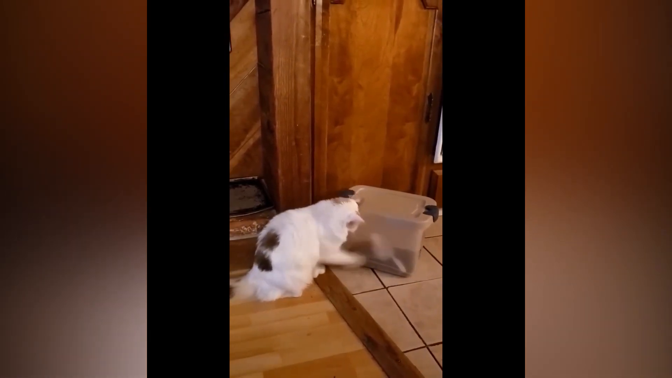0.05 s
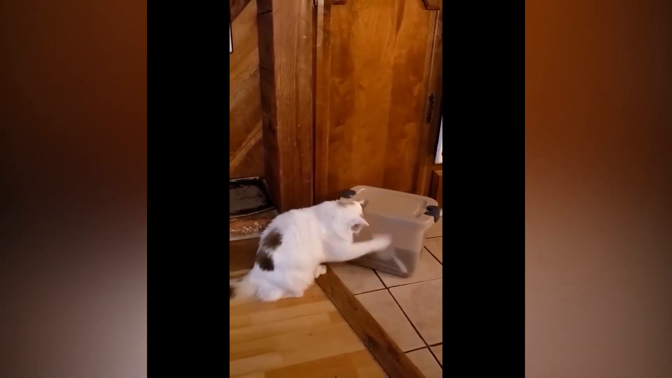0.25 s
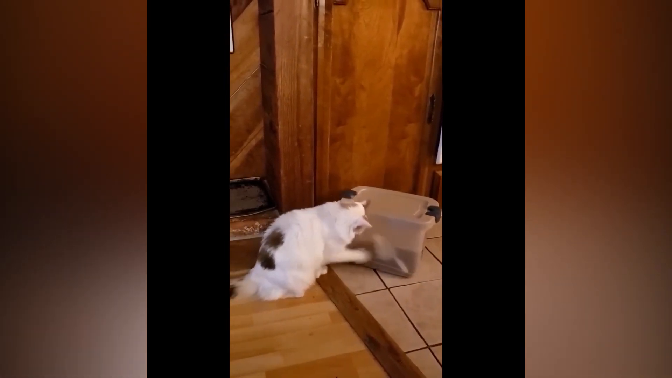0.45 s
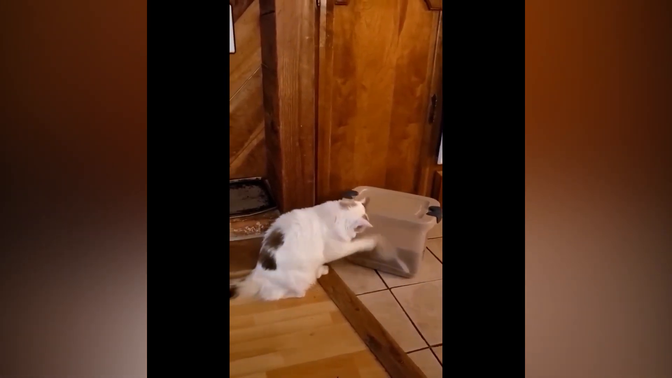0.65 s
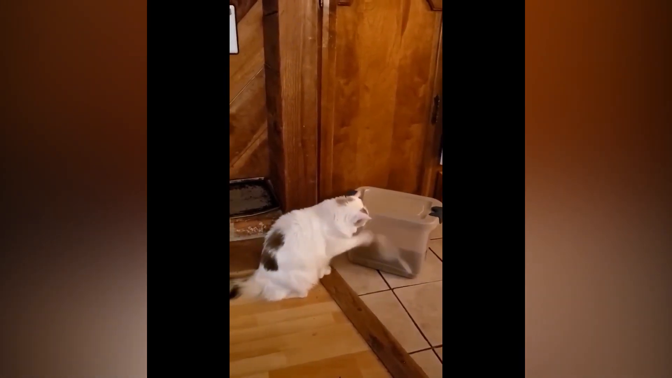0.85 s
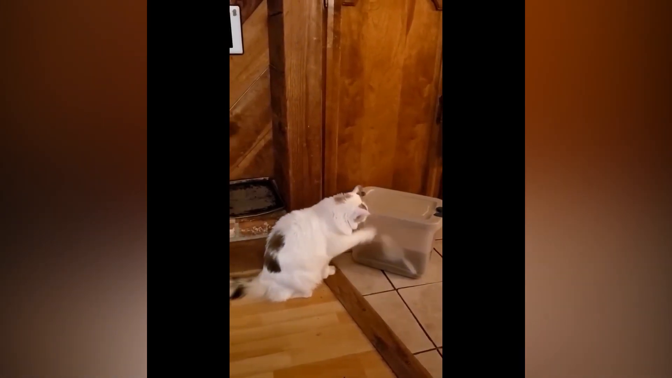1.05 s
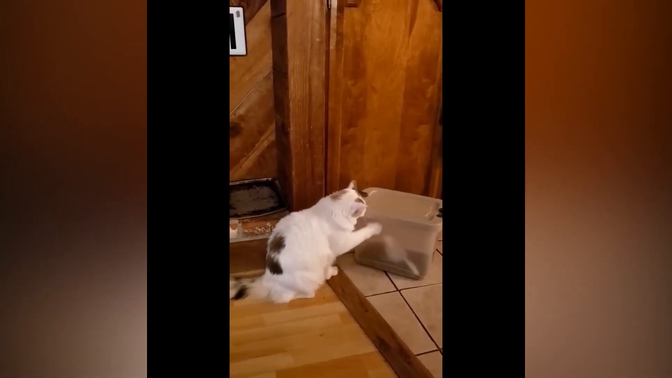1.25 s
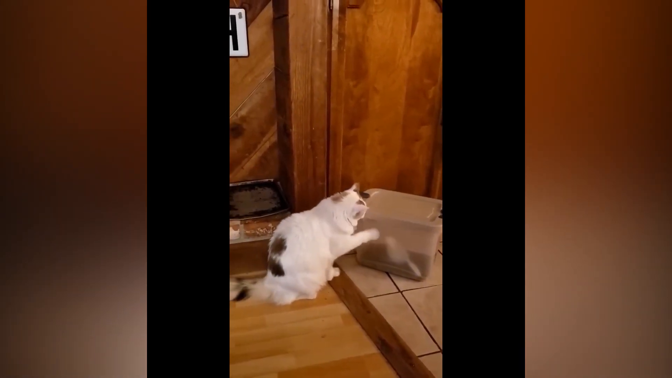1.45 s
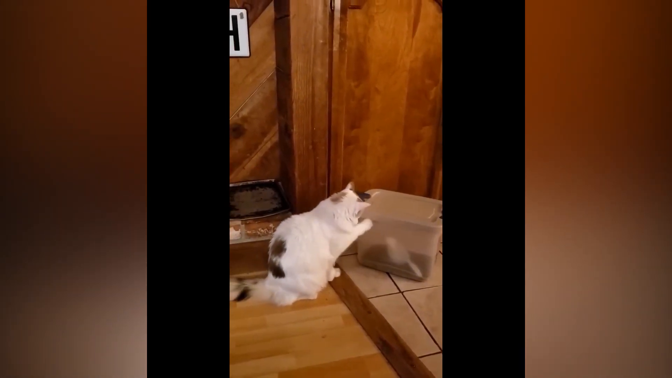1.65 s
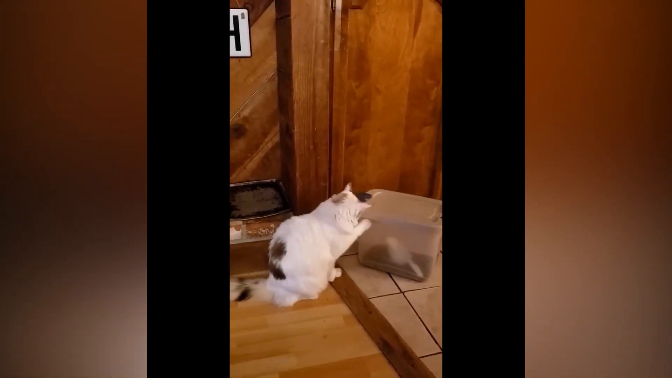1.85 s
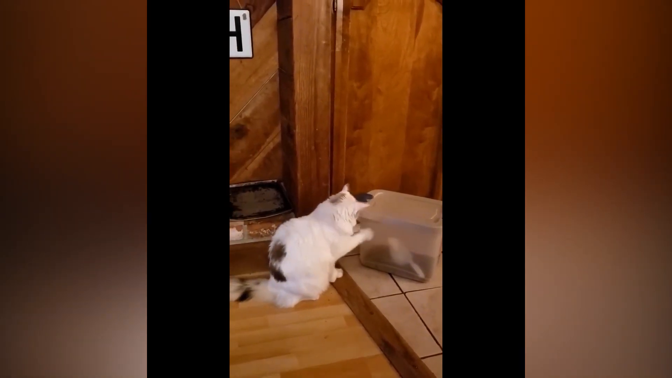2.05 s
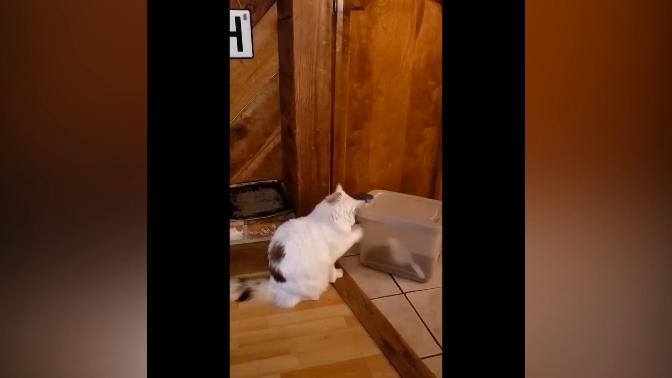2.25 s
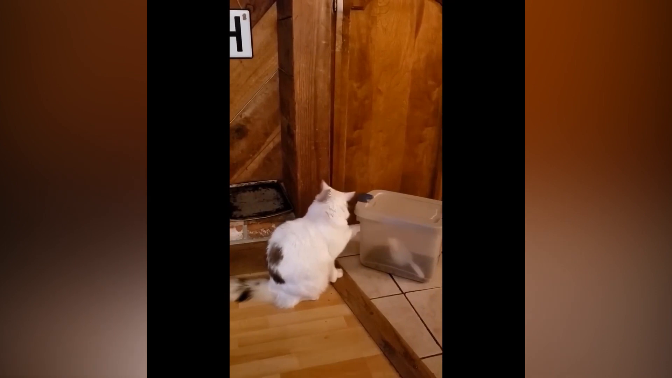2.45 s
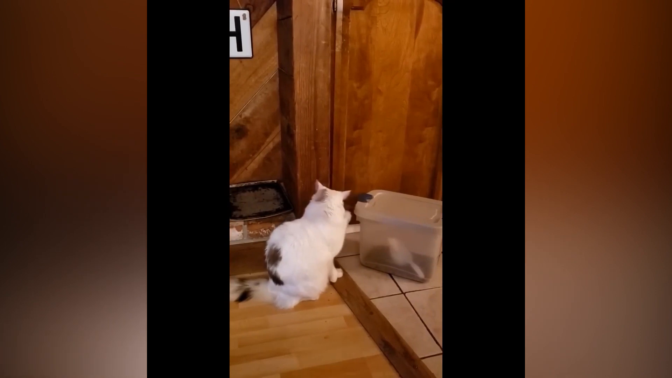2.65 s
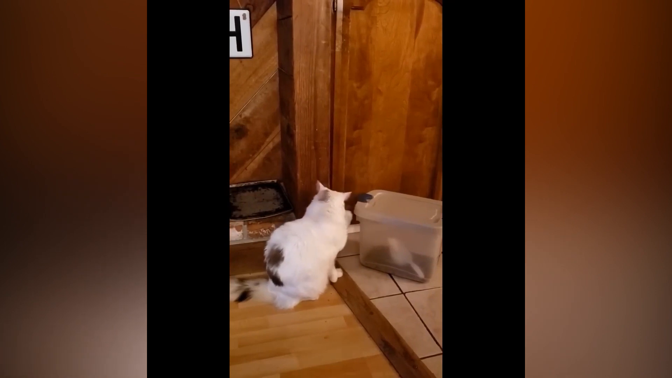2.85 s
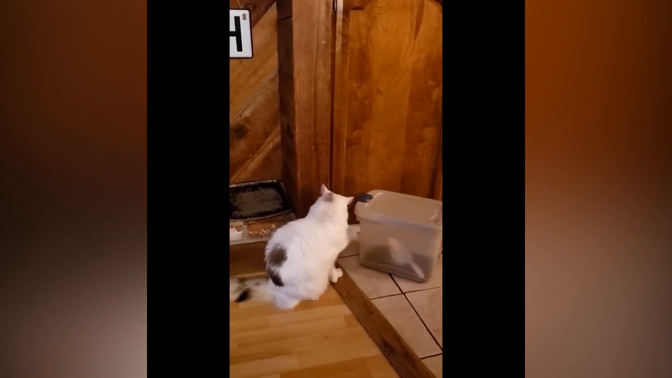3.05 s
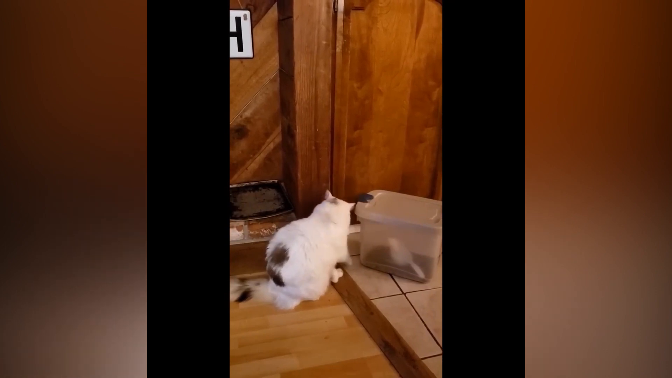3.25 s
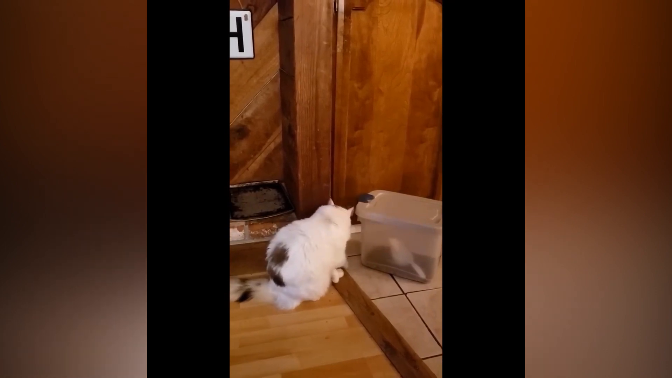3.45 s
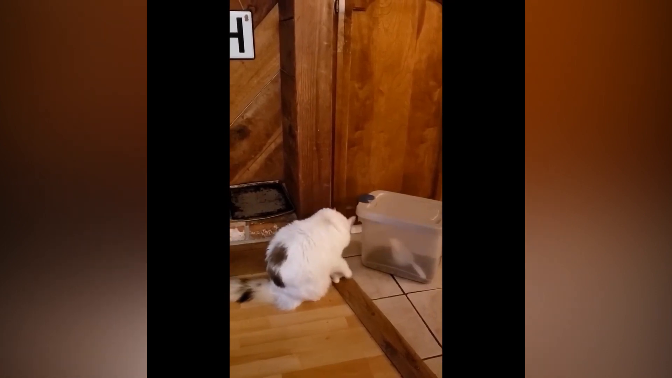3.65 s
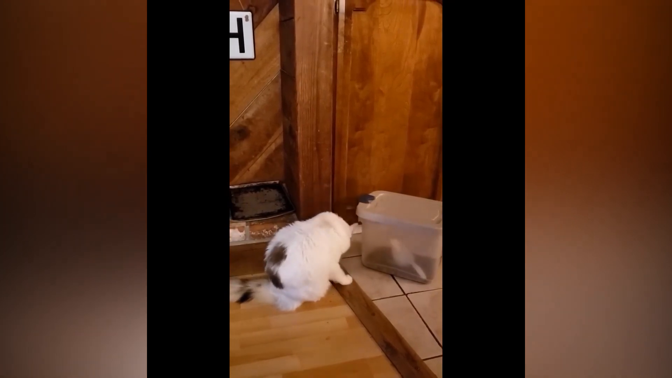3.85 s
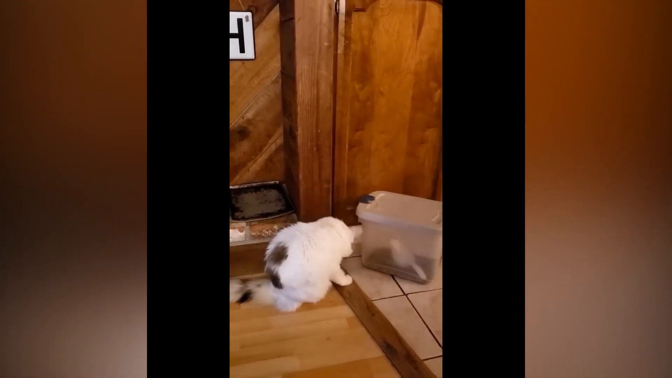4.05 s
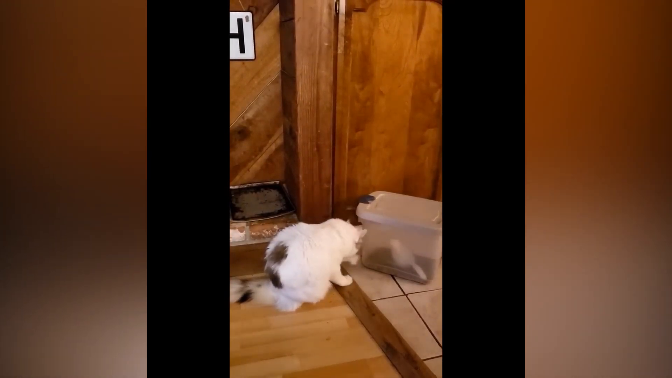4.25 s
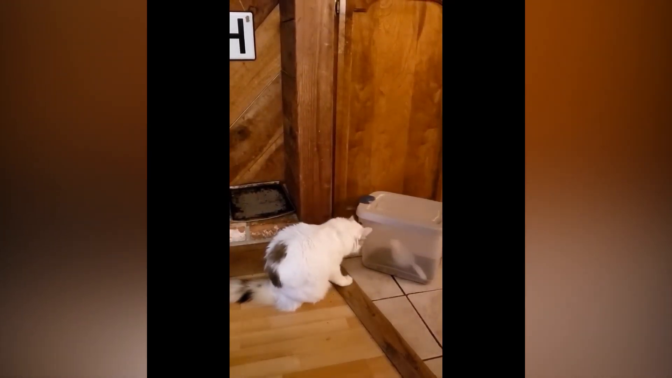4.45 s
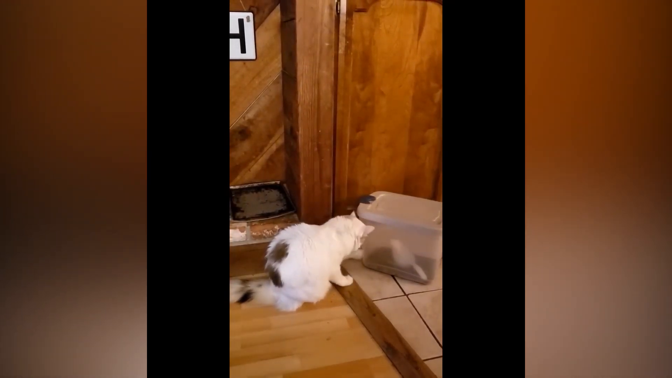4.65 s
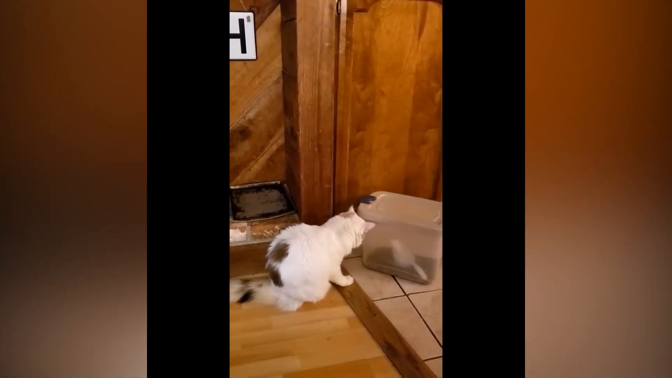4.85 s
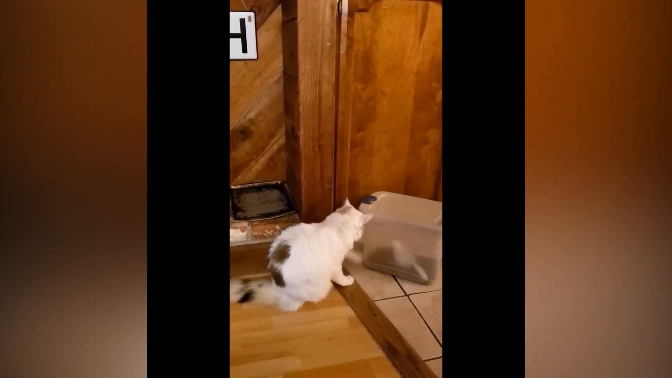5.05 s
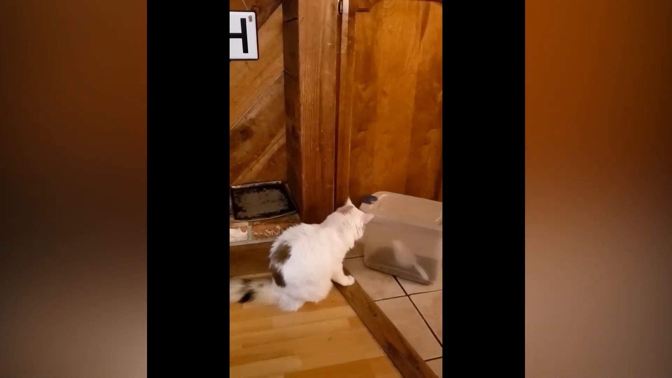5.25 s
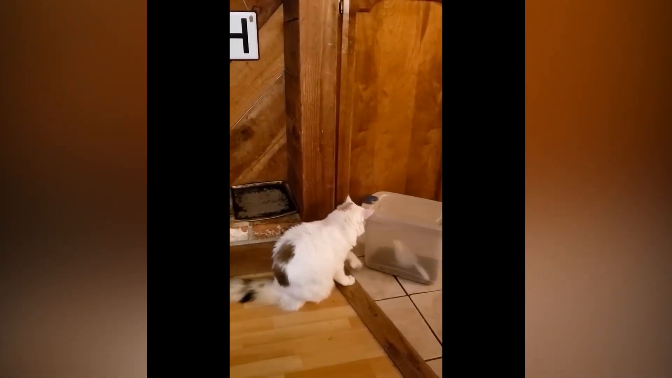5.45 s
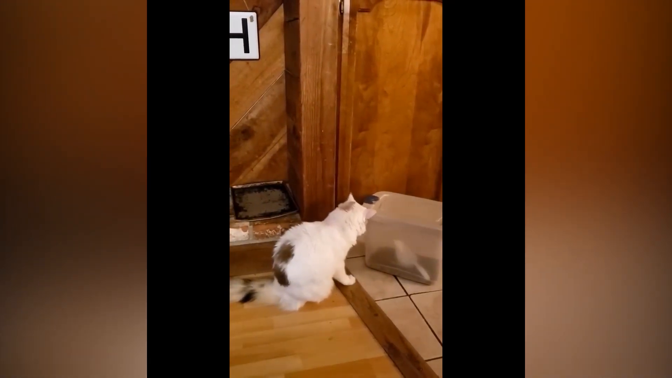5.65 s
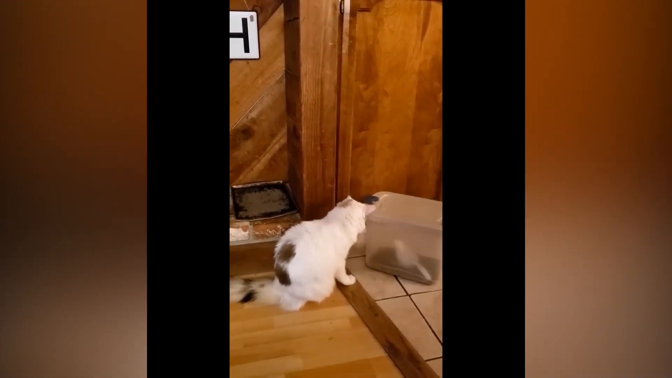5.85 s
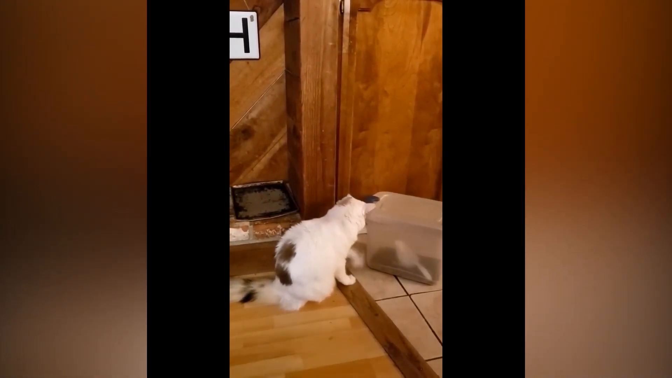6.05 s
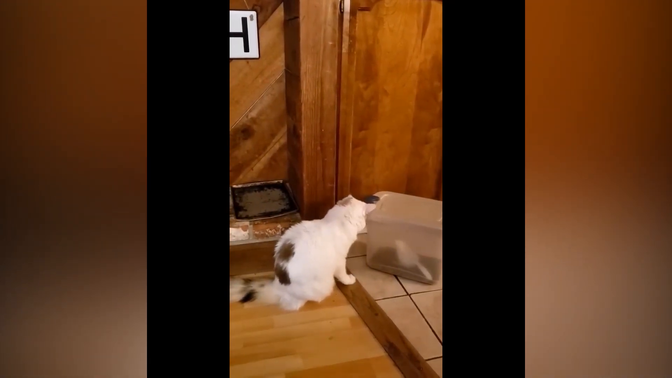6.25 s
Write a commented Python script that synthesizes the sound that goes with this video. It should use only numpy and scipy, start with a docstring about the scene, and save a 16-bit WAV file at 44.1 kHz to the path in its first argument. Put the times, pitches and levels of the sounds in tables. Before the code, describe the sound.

Over the steady hum and fan rumble of a household appliance, a cat's paws clatter on a hollow plastic bin and a claw snaps off the rim. Lighter taps and scratches follow, then a short lull, before the knocking and rasping pick up again with a brief claw squeak. It is heard from a couple of metres off, leaning left, with a little indoor reverberation.

```python
"""A cat paws at an empty plastic storage bin on a tiled floor, a couple of metres away to the left.
Each pat clacks the thin shell and flexes a wall with a hollow thump; claws snap free of the rim,
squeak and scrape in short strokes. A hard, wood-lined room rings after them,
over a bed of hum and fan rumble from a household appliance."""
import sys
import numpy as np
from scipy import signal
from scipy.fft import rfft, irfft, next_fast_len
from scipy.io import wavfile

SR = 44100
rng = np.random.default_rng(int(sys.argv[2]) if len(sys.argv) > 2 else 0)


def transcribe(signal):
    """Save signal, clipped to [-1, 1], as a 16-bit WAV file at the path in sys.argv[1]."""
    frames = np.atleast_2d(signal).T
    limited = np.clip(frames, -1, 1)
    pcm = np.round(limited * 32767).astype(np.int16)
    wavfile.write(sys.argv[1], SR, pcm)


N = 278269
T = np.arange(N) / SR
SIDES = np.array([[1], [-1]])  # left, right

# motor hum: pitch_hz, level_db, waver_share
MOTOR_HUM = [(59.84, -44, 0.81), (121.3, -43, 0.82), (161.6, -52, 1), (201.6, -45.5, 0.58),
             (240.3, -48, 0.1), (349.5, -47, 0.98)]
# fan rumble and microphone hiss: frequency_hz, density_db
NOISE_BED = [(22, -92), (58, -65), (88, -66.5), (130, -68), (200, -58), (280, -70.5), (380, -69.5),
             (600, -81.5), (880, -83), (1400, -95.5), (2600, -99), (8500, -111), (12000, -104),
             (15000, -101)]
# placement of the appliance: frequency_hz, left_minus_right_db
APPLIANCE_PAN = [(60, 12.5), (200, 5.6), (700, 13.7), (1300, 8.8), (2400, 1.4), (15000, 2.3)]
# placement of the bin and its reverb: frequency_hz, left_minus_right_db
BIN_BALANCE = [(60, 8.5), (200, 5.5), (700, 13), (1300, 10), (2400, 4), (4400, 16), (8000, 10.5),
               (15000, 10.5)]
# room tail: frequency_hz, t60_s, wet_db
REVERB = [(148, 0.24, -1.5), (477, 0.5, -0.5), (1037, 0.51, 1), (2824, 0.4, 3.5), (7360, 0.42, 0.5),
          (15100, 0.33, 1.5)]
# what the shell radiates from a sharp contact: frequency_hz, gain_db
SHELL_EQ = [(50, -63), (160, 13), (330, 1), (450, -4), (650, 1), (1000, 0), (1700, -2), (2200, -6),
            (2800, -6), (3800, -12.5), (5500, -13.5), (7300, -9), (8400, -22.5), (11000, -11.5),
            (15000, -5)]
# ringing panels, set against the shell's broad response: pitch_hz, gain_db, t60_s
PANEL_MODES = [(330, -20, 0.14), (510, 1.5, 0.073), (584, 5.5, 0.13), (700, -20, 0.11), (910, 1, 0.12),
               (1046, -9.5, 0.024), (1340, -16, 0.114), (1470, -4.5, 0.076), (4800, -17.5, 0.059)]
# claw squeaks: peak_s, swell_s, level_db, pitch_hz, width_hz, glide_hz_per_s
CLAW_SQUEAKS = [(1.9056, 0.0012, -54, 4600, 591, 0), (1.959, 0.0022, -64, 4450, 505, 0),
                (2.538, .008, -58, 5670, 400, 0), (2.541, .01, -60, 2210, 200, 0),
                (2.562, 0.014, -54, 3780, 450, 1500), (4.715, 0.022, -55.5, 3510, 547, 1500),
                (4.73, .022, -56, 1820, 158, -2000), (5.868, .026, -40, 2440, 550, -1500),
                (6.206, .006, -47, 4865, 697, 0)]
# claws tearing free: start_s, length_s, level_db, top_db
CLAW_SNAPS = [(0.5604, 0.0037, -31, -8), (0.563, 0.005, -28.5, -2), (0.57, .007, -43, -11),
              (5.8235, 0.0075, -36, 9.5)]
# what a snap rings in the rim: pitch_hz, width_hz, gain_db
RIM_RINGS = [(2110, 230, -3), (3040, 210, -3), (4560, 280, 0.5), (3900, 790, -9), (7300, 930, -12),
             (11900, 1800, -15)]
# resonance under a dragged claw: frequency_hz, boost_db
RASP_BOOST = [(1300, 9.5), (2600, 10.5), (3700, 10.5), (6800, 11.5)]
# strokes and the two resonances of each spot:
# peak_s, rise_s, fall_s, level_db, hardness_db, top_db, low_hz, high_hz
CLAW_STROKES = [(.170, 0.024, 0.074, -37, 5.5, -16, 935, 2430),
                (0.428, 0.025, 0.17, -45, 6.5, -19, 1810, 3570),
                (0.548, 0.0091, 0.024, -43.5, 11, -4, 2980, 7000),
                (0.952, 0.034, 0.083, -59, 2.5, -8, 4500, 6740),
                (1.381, 0.011, 0.032, -39.5, 10, -31, 1880, 2720),
                (1.755, 0.023, 0.036, -45.5, 4, -17, 1920, 2730),
                (2.108, 0.025, 0.047, -51, 0, -14, 1570, 2310),
                (2.535, 0.0069, 0.035, -51, 3.5, -5.5, 2260, 3530),
                (4.447, 0.008, 0.024, -49, -3.5, -20, 1320, 1900),
                (4.695, 0.02, 0.05, -46, -7.5, -20, 1500, 3580),
                (5.168, 0.043, 0.059, -55, 6.5, -5, 1350, 2540),
                (5.44, 0.029, 0.065, -43, -11, -12, 1100, 1830),
                (5.535, 0.03, 0.039, -40.5, -4, -9.5, 920, 1310),
                (5.812, 0.013, 0.033, -35.5, 0.5, -4.5, 1250, 2627),
                (5.827, 0.004, 0.022, -35.5, 11, 13, 1190, 2780),
                (5.862, 0.021, 0.042, -37, 8, -17, 2570, 5830),
                (6.145, 0.021, 0.022, -37.5, -1, -11.5, 1220, 2100),
                (6.193, 0.02, 0.029, -44, 10, -10, 2070, 4330)]
# pats, knocks and rebounds, with the three resonances of each spot and the wall's thump:
# start_s, level_db, hardness_db, body_db, low_hz, mid_hz, high_hz, boost_db, thump_hz, thump_db
PAW_HITS = [(0.02, -31.5, -5.5, 1, 1000, 1370, 1570, 10, 172.3, -8.5),
            (.04, -33, -14, -1, 600, 940, 3840, 7.8, 163, -11.5),
            (0.069, -37, -4, 3, 605, 1350, 1990, 9.7, 177, -40),
            (0.1455, -26, 5, -10, 1050, 1880, 2680, 12, 182, -12.5),
            (0.148, -25, 5, 0.5, 1035, 2850, 4430, 13.2, 170, -27),
            (.162, -21.5, 5.5, 7.5, 900, 1090, 1450, 7.6, 163.6, -19),
            (.1678, -27, 2, 5.5, 690, 1000, 2400, 3.6, 155.6, -10),
            (0.173, -26.5, -3, 7, 576, 696, 1410, 4.5, 131, -21),
            (0.177, -31, -8, 11, 640, 1000, 1700, 7.7, 161, -44),
            (0.186, -33.5, -1, 11, 580, 700, 2450, 7.9, 160, -15),
            (0.195, -37, 1, 2, 717, 980, 2500, 6, 165.4, -42),
            (.222, -36, -2, 2, 700, 960, 2560, 6, 164, -35),
            (0.3889, -26, -4.5, -14, 1520, 1710, 3500, 9.9, 174.5, -17),
            (.407, -27.5, -0.5, -4, 676, 1760, 3400, 8, 169.5, -17.5),
            (0.546, -41, 8, -4, 1900, 2400, 2980, 9, 170, -41),
            (0.5628, -39.5, 18, 12, 650, 1100, 4600, 4.4, 169, -50),
            (.607, -39, 0, 4.5, 800, 1170, 1900, 8, 184, -50),
            (0.6112, -32.5, -7, -3, 1090, 1380, 1810, 7.3, 183, -40),
            (.626, -37, 11, -4, 940, 1420, 2100, 6.1, 185, -42),
            (1.369, -40.5, 7.5, -5, 1510, 1970, 3420, 8, 195, -29),
            (1.378, -38, 4, -7, 1850, 2430, 2900, 15, 172, -13.5),
            (1.904, -63, 18.5, -6, 2500, 4520, 4830, 7, 172, -55),
            (1.956, -70, 4, -6, 2500, 4300, 4700, 8, 170, -60),
            (2.111, -43.5, 6.5, -16, 1520, 2400, 3970, 12.4, 180, -27),
            (2.123, -50, 13, -5, 1600, 2300, 7000, 7.6, 180, -36),
            (2.2524, -56, 4, 0, 1050, 2000, 3000, 6.6, 180, -54),
            (4.0594, -61, -12.5, 6, 800, 1120, 1595, 6, 178, -38),
            (4.439, -48.5, -5, -1, 1300, 1900, 2720, 9.4, 170, -52),
            (4.676, -39.5, -7, 6, 920, 1650, 2730, 6.9, 179, -32),
            (5.010, -35, -10, 2.5, 870, 1280, 1600, 6.5, 191, -18.5),
            (5.194, -36, 0, -4, 1130, 1550, 4860, 13.8, 181, -38),
            (5.207, -43.5, -19, 2, 1160, 1570, 2720, 7, 187, -44),
            (5.3961, -26.5, -13, -4, 900, 1140, 1710, 8.4, 362, -26),
            (5.403, -44, -19, 1, 590, 1070, 2700, 7.4, 165, -19.5),
            (5.5154, -29.5, -9.5, -8, 1000, 1370, 2820, 11, 182, -30),
            (5.567, -42.5, 16, -10, 4540, 5950, 7000, 1, 170, -56),
            (5.5798, -39, 2, -6, 1450, 4500, 7000, 3.7, 170, -59),
            (5.757, -31, -16, 4.5, 630, 1170, 1930, 11.6, 186, -23.5),
            (5.769, -37, -7, -1, 680, 1240, 1950, 14, 183, -39),
            (5.803, -33.5, 1, -5, 1250, 2100, 2770, 12, 167, -19.5),
            (5.8245, -32, 0, -12, 700, 1200, 1600, 5.8, 150, -23),
            (5.868, -36, 5, -15, 1300, 2700, 4200, 6.7, 185, -45),
            (5.891, -36, 9, -14, 1100, 1430, 2770, 5.5, 185, -45),
            (6.067, -27.5, -6.5, 4, 1190, 1746, 2840, 9.3, 168, -31),
            (6.07, -28, -11, -2, 630, 1190, 1730, 6.9, 114, -16),
            (6.08, -40, -7, 10, 1000, 1720, 2800, 4.8, 113, -30),
            (6.147, -34.5, 1, -1, 560, 1260, 2030, 9.2, 183, -34),
            (6.162, -35, 5, 9, 1270, 2040, 2700, 6, 180, -47),
            (6.176, -32, -1, -6, 1080, 2030, 2580, 13.7, 180, -50)]


def undb(db):
    """Decibels to gain."""
    return 10 ** (np.asarray(db) / 20)


def along(points, hz):
    """Read (Hz, value) points on a log-frequency axis."""
    f, value = np.transpose(points)
    return np.interp(np.log(np.maximum(hz, 1)), np.log(f), value)


def bins(size):
    """Frequencies of a real spectrum."""
    return np.fft.rfftfreq(size, 1 / SR)


def eq(x, db_at):
    """Minimum-phase EQ whose gain in dB is a function of frequency."""
    size = 2 * next_fast_len(x.shape[-1])
    cepstrum = irfft(np.log(undb(db_at(bins(size)))))
    cepstrum[1:size // 2] *= 2
    cepstrum[size // 2 + 1:] = 0
    return irfft(rfft(x, size) * np.exp(rfft(cepstrum)))[..., :x.shape[-1]]


def pan(pair, points):
    """Share each frequency between left and right."""
    return np.array([eq(channel, lambda f: 20 * np.log10(2 / (1 + undb(-side * along(points, f)))))
                     for channel, side in zip(pair, (1, -1))])


def add(track, start_s, x):
    """Mix a sound in at its cue."""
    i = max(int(start_s * SR), 0)
    track[..., i:i + x.shape[-1]] += x[..., :max(N - i, 0)]


def fade(t, t60):
    """Decay of 60 dB in t60."""
    return np.exp(-np.log(1000) * t / t60)


def waver(rate_hz, t=T):
    """Random modulation with a spread near 1."""
    knots = rng.standard_normal(512)
    return np.interp((t - t[0]) * rate_hz, np.arange(len(knots)), knots)


def even_out(burst):
    """Give a burst unit energy and no dominant pitch."""
    power = np.abs(rfft(burst)) ** 2
    burst = eq(burst, lambda f: -10 * np.log10(np.interp(f, bins(len(burst)), power) + power.mean() * .7))
    return burst / np.linalg.norm(burst)


def appliance(waver_hz=18):
    """Wavering motor tones over fan rumble; the bass sits near mono, the hiss is wide."""
    hum = np.zeros(N)
    for hz, db, share in MOTOR_HUM:
        steady = np.sqrt(2 * (1 - min(share, 1) ** 2))
        drift = share * (waver(waver_hz) + 1j * waver(waver_hz))
        hum += undb(db) * np.real((steady + drift) * np.exp(2j * np.pi * hz * T))
    mid, side = rng.standard_normal((2, N)) * np.sqrt(SR / 2)
    side = eq(side, lambda f: along([(150, -15), (600, -5), (1200, 0)], f))
    return hum + eq(mid + SIDES * side, lambda f: along(NOISE_BED, f))


def room(direct, send, build_s=0.00074, wide_hz=700, left_lag_samples=2):
    """Direct sound, then a diffuse tail; long waves reach both microphones alike."""
    t = T[:SR * 3 // 4]
    f = bins(len(t))
    mid, side = rfft(rng.standard_normal((2, len(t))))
    noise = mid + SIDES * side * np.minimum(f / wide_hz, 1)
    response = np.zeros((2, len(t)))
    room_hz, t60s, wet_dbs = np.transpose(REVERB)
    for hz in 62.5 * 2 ** np.arange(9):
        t60, wet_db = (np.interp(np.log(hz), np.log(room_hz), column) for column in (t60s, wet_dbs))
        octave = (f >= hz / np.sqrt(2)) & (f < hz * np.sqrt(2))
        tail = irfft(noise * octave, len(t)) * fade(t, t60) * (1 - np.exp(-t / build_s))
        tail /= np.linalg.norm(tail, axis=1, keepdims=True)
        response += tail * np.sqrt(octave.mean()) * undb(wet_db)
    reverb = signal.fftconvolve(send[None], response, axes=1)[:, :N]
    return np.array([np.roll(direct, left_lag_samples), direct]) + reverb


def squeaks():
    """For a moment the claw sticks and slips almost evenly: a hoarse tone that may glide."""
    out = np.zeros(N)
    t = T[:SR // 4] - T[SR // 8]
    for peak_s, swell_s, db, hz, width_hz, glide in CLAW_SQUEAKS:
        grit = waver(width_hz, t) + 1j * waver(width_hz, t)
        tone = np.exp(2j * np.pi * (hz + glide * t / 2) * t)
        swell = np.exp(-(t / swell_s) ** 2 / 2)
        add(out, peak_s + t[0], undb(db) * swell * (grit * tone).real)
    return out


def snaps(drive_db=50, send_db=-5.5, room_blur=3.3):
    """A claw tears free in hard slips that ring the stiff rim: a bright, thin crack (direct, send)."""
    out = np.zeros((2, N))

    def rings_db(f, blur):
        return 10 * np.log10(sum(undb(db) ** 2 / blur / (1 + (2 * (f - hz) / (width * blur)) ** 2)
                                 for hz, width, db in RIM_RINGS))
    for start_s, length_s, db, top_db in CLAW_SNAPS:
        slips = even_out(rng.standard_normal(SR // 8) * (T[:SR // 8] < length_s))
        tone = [(400, -18), (1800, 1), (5000, -7.5), (12000, top_db)]
        crack = undb(db + drive_db) * eq(slips, lambda f: along(tone, f))
        add(out[0], start_s, eq(crack, lambda f: rings_db(f, 1)))
        add(out[1], start_s, undb(send_db) * eq(crack, lambda f: rings_db(f, room_blur)))
    return out


def contact(force, body_db, hard_db, top_db, resonances, width_octaves, knee_share):
    """A soft pad is dull, a claw tip bright and thin; each spot adds its resonances (direct, send)."""
    knee_db = hard_db + knee_share * (top_db - hard_db)
    bass_db = -2.9 * max(hard_db - 5.5, 0)  # only the hardest contacts lose bass
    tone = [(180, bass_db), (300, 0), (600, body_db), (1100, 0), (2000, 0),
            (3900, hard_db), (8500, knee_db), (14500, top_db)]

    def gain_db(f, height, octaves):
        peaks = sum(height * db / (1 + (np.log2(np.maximum(f, 1) / hz) / octaves) ** 2)
                    for hz, db in resonances)
        return along(tone, f) + peaks
    direct = eq(force, lambda f: gain_db(f, 1, width_octaves))
    # all directions blend in the room, so the peaks blur: lower and wider
    send = eq(force, lambda f: gain_db(f, 0.6, 1.62 * width_octaves))
    return np.array([direct, send])


def scrapes(slips_per_s=2600, grain_db=1.5, judder_hz=170, judder_db=4.5, drive_db=11):
    """A dragged claw rasps in a swarm of tiny, uneven slips that swells and dies away."""
    force = np.zeros((2, N))
    lead_s = 1 / 6
    t = T[:SR // 2] - lead_s
    for peak_s, rise_s, fall_s, db, hard_db, top_db, low_hz, high_hz in CLAW_STROKES:
        slipping = rng.random(len(t)) < slips_per_s / SR
        slips = slipping * undb(grain_db * rng.standard_normal(len(t))) * rng.choice([-1, 1], len(t))
        swell = np.where(t < 0, np.exp(-(t / rise_s) ** 2 / 2), np.exp(-np.abs(t) / fall_s))
        judder = undb(judder_db * waver(judder_hz, t))  # the claw grips and lets go unevenly
        pressure = swell * judder / np.sqrt(np.mean(judder ** 2))
        drag = pressure * slips / slips.std()
        resonances = [(hz, along(RASP_BOOST, hz)) for hz in (low_hz, high_hz)]
        rasp = contact(drag, 0, hard_db, top_db, resonances, width_octaves=.09, knee_share=.45)
        add(force, peak_s - lead_s, undb(db + drive_db) * rasp)
    return force


def chatter(rattle_s=0.0025, rattle_gain=3.45):
    """A paw lands: one push and a few milliseconds of rattling contact."""
    t = T[:SR // 8]
    blow = rng.standard_normal(len(t)) * np.exp(-(t / rattle_s) ** 2 / 2)
    blow *= rattle_gain / np.linalg.norm(blow)
    blow[0] += 1
    return even_out(blow)


def pats(drive_db=33, shudder_hz=64, wall_rise_s=0.0016, thump_direct_db=1.5, thump_send_db=-0.5):
    """Each blow clacks the shell; the flexing wall thumps at a pitch set by where it is hit."""
    force, thump = np.zeros((2, N)), np.zeros(N)
    t = T[:SR // 3]
    shudder = undb(-25) * np.sin(2 * np.pi * shudder_hz * t) * fade(t, t60=0.63)  # the bin on the tiles
    wall_eq = [(30, -20), (120, -1.5), (300, 1.0), (1000, -8.5)]  # a small wall gives little deep bass
    for start_s, db, hard_db, body_db, *spot_hz, boost_db, thump_hz, thump_db in PAW_HITS:
        top_db = -18 + 1.12 * hard_db  # harder hits have a crisper top
        resonances = [(hz, boost_db) for hz in spot_hz]
        knock = contact(chatter(), body_db, hard_db, top_db, resonances, width_octaves=.11, knee_share=.55)
        add(force, start_s, undb(db + drive_db) * knock)
        swing = np.sin(2 * np.pi * thump_hz * t) * fade(t, t60=0.073) * (1 - np.exp(-t / wall_rise_s))
        swing = eq(swing, lambda f: along(wall_eq, f))
        add(thump, start_s, undb(thump_db) * (swing + shudder))
    return force, np.outer(undb([thump_direct_db, thump_send_db]), thump)


def plastic_bin(force, delay_at_1khz_s=0.001219):
    """The shell answers with a broadband clack, and its panels ring on."""
    t = T[:SR // 2]
    response = sum(undb(db) * 2 * np.log(1000) / (t60 * SR) * np.sin(2 * np.pi * hz * t) * fade(t, t60)
                   for hz, db, t60 in PANEL_MODES)
    response[0] += 1
    # bending waves carry the treble faster than the bass
    lag_phase = 4 * np.pi * delay_at_1khz_s * np.sqrt(1000 * bins(len(t)))
    response = irfft(rfft(response) * np.exp(-1j * lag_phase), len(t))[:SR // 3]
    ringing = signal.fftconvolve(force, response[None], axes=1)[:, :N]
    return eq(ringing, lambda f: along(SHELL_EQ, f))


def scene(bed_lag_samples=18):
    """The bin and its reverb lean left, over the appliance, which reaches the left microphone first."""
    blows, thump = pats()
    direct, send = plastic_bin(blows + scrapes()) + thump + snaps() + squeaks()
    left, right = pan(appliance(), APPLIANCE_PAN)
    bed = np.array([left, np.roll(right, bed_lag_samples)])
    return bed + pan(room(direct, send), BIN_BALANCE)


def record(dry, top_hz=15850):
    """The phone cuts the top end with a steep low-pass."""
    return signal.sosfilt(signal.ellip(10, .2, 80, top_hz, fs=SR, output="sos"), dry)


dry = scene()
out = record(dry)
transcribe(out)
```